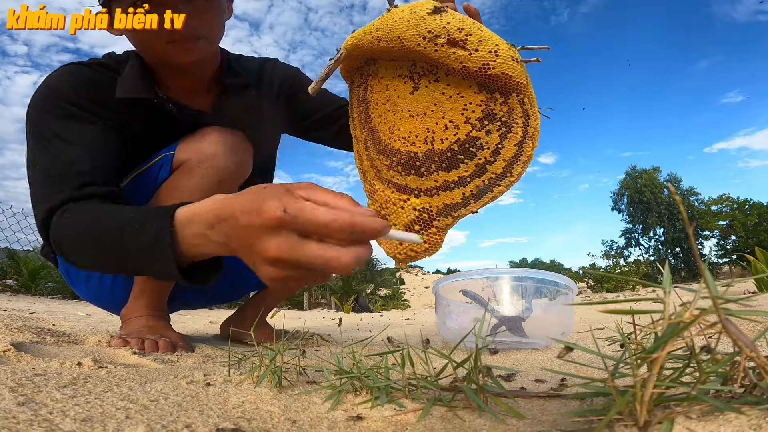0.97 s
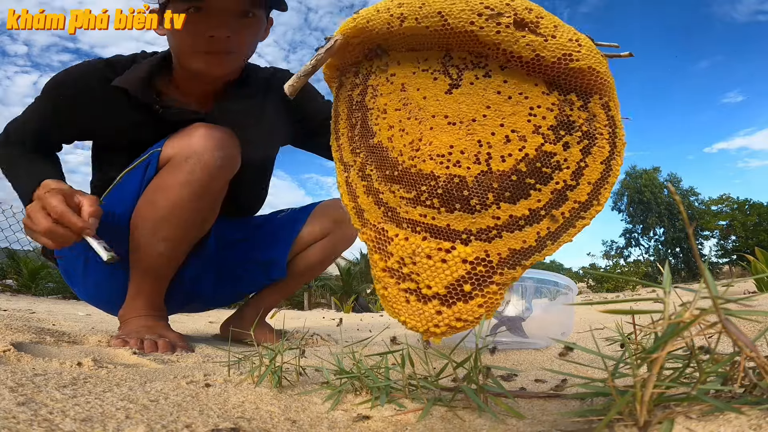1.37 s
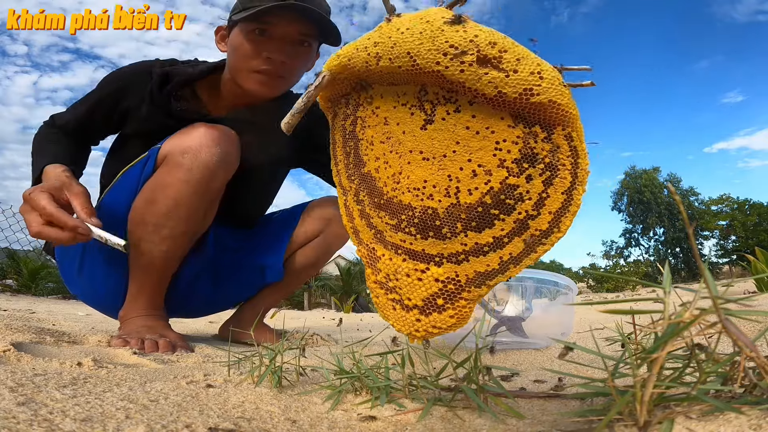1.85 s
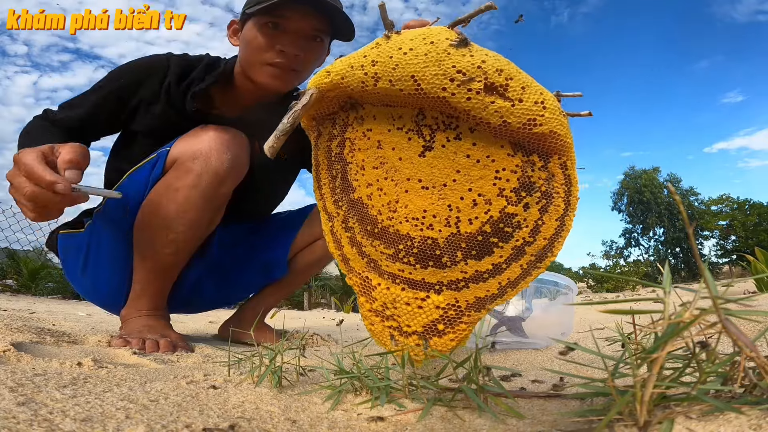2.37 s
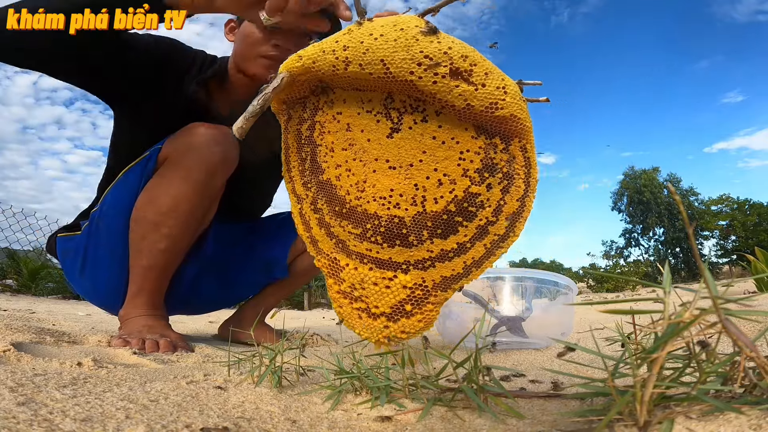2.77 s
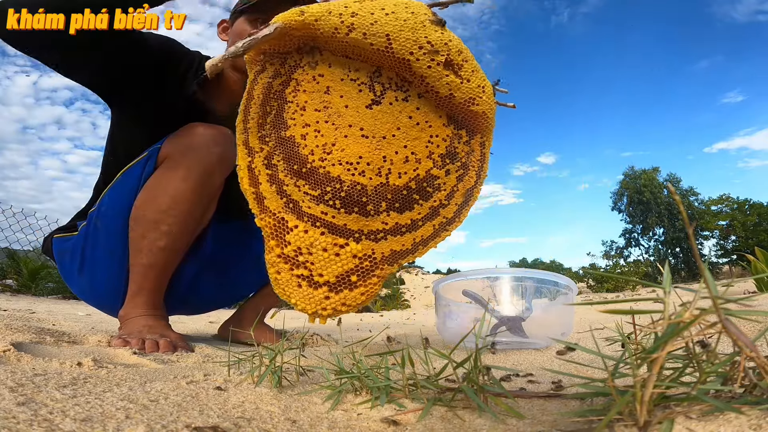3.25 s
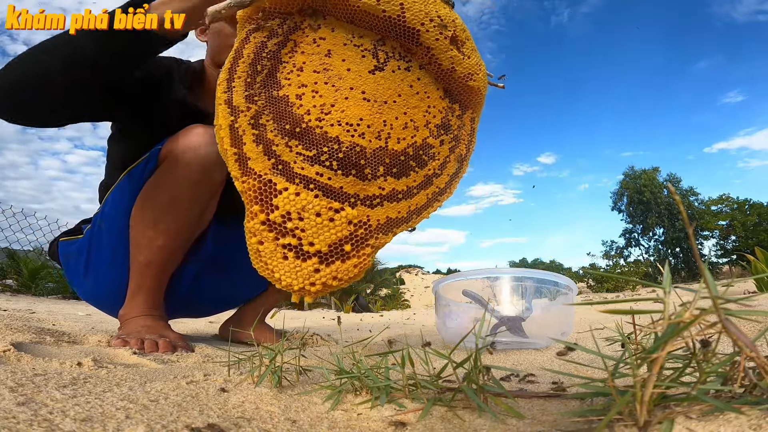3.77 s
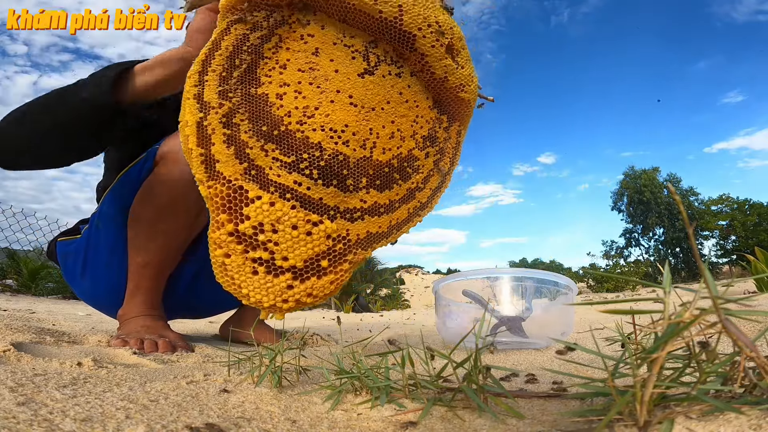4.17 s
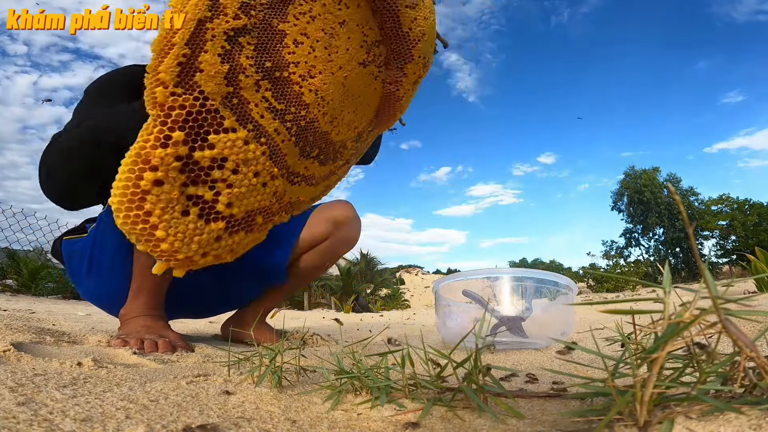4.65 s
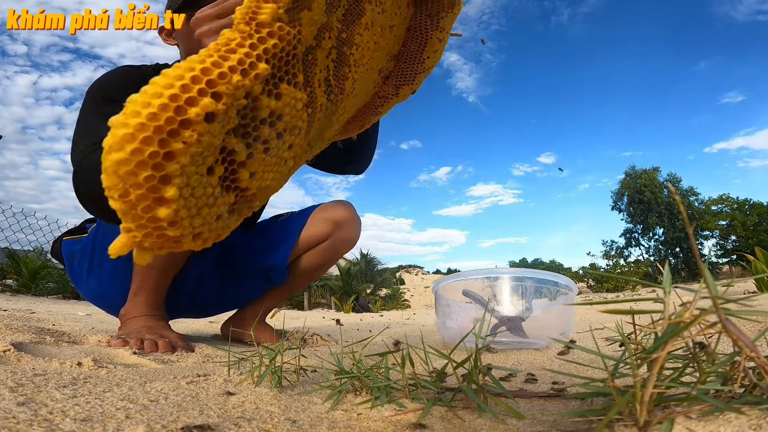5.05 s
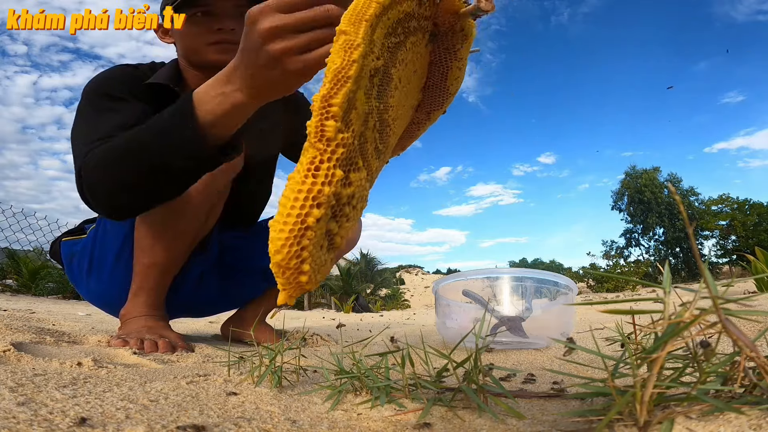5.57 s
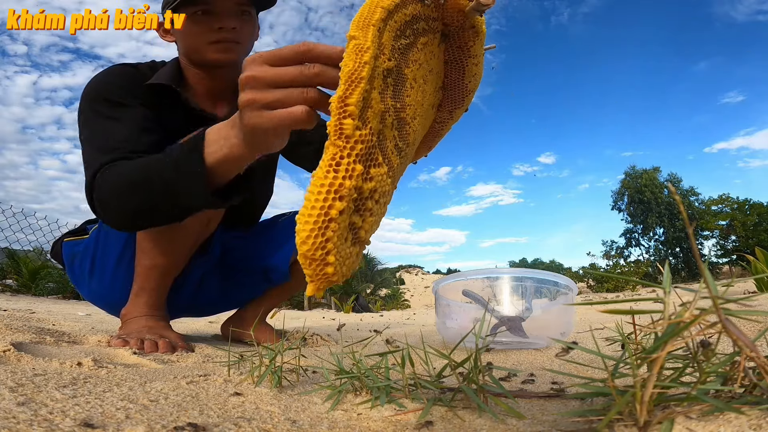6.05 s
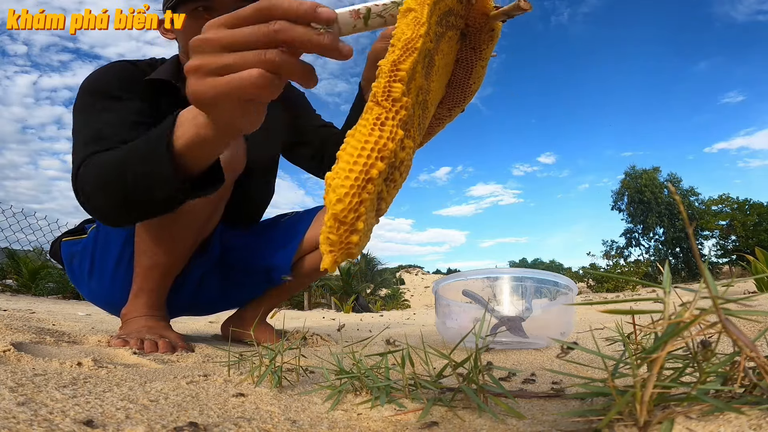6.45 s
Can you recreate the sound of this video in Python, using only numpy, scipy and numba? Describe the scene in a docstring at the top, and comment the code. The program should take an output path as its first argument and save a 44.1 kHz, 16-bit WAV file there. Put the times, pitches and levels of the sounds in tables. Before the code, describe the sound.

Someone picks at a wax comb in the open air, near a small camera microphone. Crunchy strokes and snapping cell walls come first, then a calmer middle of fine rustling and sparse clicks, a barely audible cricket trill, and finally renewed scraping and sharp crackles. Under it all lie a loose low hum of bees, a throbbing far-off engine and a soft wind rumble.

```python
"""A honeycomb is turned, scraped and picked: gritty stick-slip bursts, snapping cell walls and knocks through the wax,
all made of clicks or noise ringing in band-pass filters. Dry fibres tick and cloth rustles in fine dense grains.
Bees hum about it as stacks of wing-beat harmonics and a cricket trills faintly on one wavering tone.
Three distant engines drone as low sine orders (one slows down in steps);
wind and far traffic wash underneath as noise in swelling half-octave bands."""
import sys
import numpy as np
from scipy import signal
from scipy.fft import rfft, irfft
from scipy.io import wavfile
from scipy.ndimage import uniform_filter1d
from numba import njit

SR = 44100
rng = np.random.default_rng(int(sys.argv[2]) if len(sys.argv) > 2 else 0)


def wav_out(sig):
    """Save sig, one row per channel (or a flat mono array), as 16-bit PCM at SR to the path in sys.argv[1]."""
    wavfile.write(sys.argv[1], SR, np.round(np.clip(np.atleast_2d(sig).T, -1, 1) * 32767).astype(np.int16))


N = 296352


def undb(db):
    """Decibels to an amplitude factor."""
    return 10 ** (np.asarray(db) / 20)


def unit(x):
    """Scale to rms 1."""
    return x / np.sqrt(np.mean(x ** 2))


def peak(x):
    """Scale to peak 1."""
    return x / np.abs(x).max()


def curve(rows):
    """Columns of a breakpoint table at every sample; the first column is time [s]."""
    times, *columns = np.transpose(rows)
    return [np.interp(np.arange(N) / SR, times, column) for column in columns]


@njit
def svf(x, hz, width):
    """State-variable band-pass with a moving centre, gain 1 at the centre."""
    y, band_state, low_state = np.empty(len(x)), 0., 0.
    for i in range(len(x)):
        g = np.tan(np.pi * hz[i] / SR)
        damping = width / hz[i]
        v = (band_state + g * (x[i] - low_state)) / (1 + g * (g + damping))
        band_state = 2 * v - band_state
        low_state = low_state + 2 * g * v
        y[i] = damping * v
    return y


def band(x, hz, width):
    """Band-pass at a fixed or moving centre; hz and width in Hz."""
    return svf(x, hz + np.zeros(len(x)), float(width))


def steep(x, hz, width):
    """The same band-pass twice, for steeper skirts."""
    return band(band(x, hz, width), hz, width)


def walk(rate, size=N):
    """Random levels held 1 / rate s and slewed twice, on a grid of size points; spread near 1."""
    hold = int(SR / rate * size / N)
    steps = np.repeat(rng.standard_normal(size // hold + 1), hold)
    return 1.3 * uniform_filter1d(uniform_filter1d(steps, hold), hold)[:size]


def grit(rate, spread_db):
    """Random clicks, rate a second on average, most small and a few large; rms 1."""
    hits = rng.random(N) < rate / SR
    return unit(hits * rng.standard_normal(N) * undb(spread_db * rng.exponential(size=N)))


def wide(mid, side, side_db):
    """Stereo from a mid signal and a side signal that is opposite in the two ears."""
    return mid + undb(side_db) * side * np.array([[1], [-1]])


def wax(x):
    """The comb's dull resonances, as parallel band-passes."""
    # wax resonances: (centre [Hz], width [Hz], gain [dB])
    resonances = [(453, 390, 24.5), (800, 1300, 25), (1360, 5200, -33)]
    return sum(undb(db) * steep(x, hz, width) for hz, width, db in resonances)


def scrapes():
    """Stick-slip on wax: quick grains ring a treble band, slower slips rumble in the comb."""
    # strokes on the comb: (full pressure from [s], held for [s], gritty treble [dB], treble centre [Hz],
    # wax rumble [dB], brittle top [dB])
    strokes = [(0.081, 0.11, -62, 4600, -59.5, -68.5), (0.401, 0.06, -59, 5200, -57.5, -68.5),
               (0.616, 0.034, -66.5, 5000, -73, -74), (0.754, 0.015, -55, 4900, -49.5, -63),
               (0.778, 0.014, -56, 5300, -51, -60), (0.791, 0.016, -44.5, 5800, -46.5, -64),
               (0.929, 0.2, -74, 4380, -57.5, -82), (1.092, 0.016, -45.5, 5280, -51.5, -69),
               (2.575, 0.037, -70, 4900, -68, -75), (2.993, 0.028, -75, 4670, -69, -86),
               (3.481, 0.011, -76, 4500, -57, -80), (3.557, 0.012, -57.5, 4600, -67, -70),
               (3.98, 0.13, -76, 4700, -64, -78.5), (4.347, 0.017, -66, 6400, -80, -84),
               (4.388, 0.011, -66.5, 6300, -78, -80), (5.46, 0.036, -65.5, 4400, -62, -75),
               (5.883, 0.051, -71, 4170, -65, -89), (5.93, 0.12, -67.5, 4030, -63, -91),
               (6.24, 0.033, -58.5, 3870, -56, -77), (6.6, 0.012, -58, 4070, -65, -76),
               (6.619, 0.037, -53.5, 4100, -67, -70), (6.642, 0.008, -48, 4240, -55, -68),
               (6.666, 0.0025, -42, 4430, -55, -60), (6.682, 0.01, -66, 4600, -75, -71)]
    attack_s, release_s = 0.016, 0.013  # ramps before and after the held part
    air_db, air_db_per_octave = -18, 15  # hiss against the gritty treble at 5 kHz; more in higher scrapes
    gains, hz, t = np.zeros((3, N)), np.full(N, 5000.), np.arange(N) / SR
    for start, length, db, centre, rumble_db, top_db in strokes:
        rise = 1 + (t - start) / attack_s
        fall = 1 + (start + length - t) / release_s
        press = np.clip(np.minimum(rise, fall), 0, 1) ** 2
        gains += press * undb([[db], [rumble_db], [top_db]])
        hz = np.where(press > 0, centre, hz)
    treble_gain, rumble_gain, top_gain = gains
    grains = grit(8000, 1.7)
    slip = undb(2.4 * walk(150) + walk(45))
    treble = unit(band(steep(grains, hz, 3800), hz, 2900))
    top = unit(band(steep(grains, 8100, 3500), 9600, 3300))
    air = undb(air_db + air_db_per_octave * np.log2(hz / 5000)) * unit(steep(grains, 10900, 3400))
    mid = slip * (treble_gain * (treble + air) + top_gain * top)
    mid += rumble_gain * unit(wax(grit(2200, 0.73)))
    side = treble_gain * unit(steep(grit(4600, 1.8), hz, 3200))
    return mid * undb(np.array([[-.4], [.4]])) + wide(0, side, -9.0)


def snaps():
    """Cell walls: each gives way for a millisecond, ticks sharply and dies out in a treble burst."""
    # breaks: (start [s], burst peak [dB], burst centre [Hz], brittle top [dB], left minus right [dB])
    breaks = [(0.019, -40, 5130, -46, -3), (0.156, -44, 4840, -62, -1.0), (0.397, -44.5, 4570, -64, -1.5),
              (0.4189, -47, 5430, -60, -1.0), (0.4349, -42, 5520, -55, -1.0),
              (0.4637, -40.5, 4430, -65, -3), (0.7322, -50, 5360, -54, -1.0),
              (0.7602, -47, 5330, -52, -1.5), (0.786, -46, 5740, -53, -1.0), (0.7924, -33, 6000, -52, -1.0),
              (0.802, -36, 5730, -51, -1.5), (1.024, -47, 3940, -60, -1.0), (1.0946, -28, 5600, -61, -1.5),
              (2.577, -50, 4800, -68, 1.0), (3.5528, -56, 4770, -64, 2.0), (3.565, -48, 4610, -67, 2.0),
              (4.0642, -54, 4720, -66, 1.5), (4.1094, -57, 4700, -54, 4), (4.8534, -57, 4810, -71, -2),
              (5.1263, -52, 3350, -71, 1.0), (5.469, -51, 4440, -67, 0.0), (5.8636, -43, 3810, -71, 0.5),
              (5.889, -45, 3900, -70, 1), (5.895, -41, 4300, -62, 3), (5.942, -43, 4460, -62, 2),
              (5.951, -43, 3940, -72, 1), (5.967, -48, 3890, -74, -0.5), (6.023, -55, 4000, -72, 2),
              (6.2056, -45.5, 4170, -69, 2), (6.2452, -58, 4340, -68, -3), (6.286, -36.5, 4200, -49, 3),
              (6.2902, -39, 4140, -53, -3), (6.582, -36, 4200, -70, 3), (6.586, -47, 4260, -67, -0.5),
              (6.604, -35, 3710, -66, -2), (6.616, -44, 4160, -65, -0.5), (6.622, -32, 4440, -64, 2),
              (6.6291, -38, 4470, -59, 0.5), (6.6432, -30, 4500, -55, 1.0), (6.649, -38, 4240, -45, -0.5),
              (6.661, -40, 4560, -48, -0.5), (6.6649, -29, 4180, -28.5, -1), (6.6686, -29, 4300, -47, 2)]
    decay_s, tick_height, air_db = 0.0015, 7, -17  # tick against the noise, air against the brittle band
    out, t = np.zeros((2, N + 1024)), np.arange(1024) / SR - .001  # the tick is at t = 0
    for (start, db, hz, top_db, pan_db), noise in zip(breaks, rng.standard_normal((len(breaks), 1024))):
        envelope = np.exp(np.minimum(2500 * t, -t / decay_s))
        burst = noise * envelope + tick_height * (np.abs(t) < .5 / SR)
        brittle = peak(band(steep(burst, 7600, 3000), 7600, 3000))
        brittle = brittle + undb(air_db) * peak(steep(burst, 11000, 4000))
        body = peak(band(steep(burst, hz, 2150), hz, 2800))
        sound = undb(db) * body + undb(top_db) * brittle
        i = int(start * SR)
        out[:, i:i + 1024] += sound * undb(np.array([[pan_db], [-pan_db]]) / 2)
    return out[:, :N]


def knocks():
    """A soft push of a cycle or two, and a little crunch through the wax."""
    # knocks through the wax: (start [s], push peak [dB], push pitch [Hz])
    pushes = [(0.0204, -35, 1180), (0.079, -48, 1400), (0.097, -42, 980), (0.117, -45, 1000),
              (0.139, -47, 1050), (0.088, -42, 694), (0.107, -49, 1400), (0.128, -45, 750),
              (0.147, -52, 1400), (0.157, -39, 1140), (0.173, -43, 780), (0.398, -37, 950),
              (0.418, -43, 980), (0.435, -42, 820), (0.447, -50, 1310), (0.464, -33, 1110),
              (0.731, -40.5, 1020), (0.756, -37.5, 870), (0.765, -39, 1010), (0.786, -34.5, 710),
              (0.795, -47, 690), (0.802, -36, 1360), (1.0245, -54, 2200), (1.0665, -42, 1100),
              (1.106, -36.5, 1190), (3.562, -50, 2500), (3.993, -43, 910), (4.009, -58, 1900),
              (3.972, -47, 800), (4.03, -53, 800), (4.048, -56, 1300), (4.0695, -43.5, 1120),
              (4.11, -50, 900), (5.129, -45, 860), (5.89, -54, 2500), (5.895, -44, 1000),
              (5.943, -48, 2300), (6.287, -41.5, 754), (6.288, -50, 2400), (6.583, -52, 2400),
              (6.623, -46, 2500), (6.666, -45, 1260), (6.667, -34.5, 2820)]
    out, t = np.zeros(N + 1024), np.arange(1024) / SR
    for (start, db, hz), noise in zip(pushes, rng.standard_normal((len(pushes), 1024))):
        push = peak(t ** 2 * np.exp(-t * hz / 0.5) * np.sin(2 * np.pi * hz * t))
        crunch = peak(wax(noise * np.exp(-t / 0.005)))
        i = int(start * SR)
        out[i:i + 1024] += undb(db) * (push + undb(-6.0) * crunch)
    return out[:N] * undb(np.array([[-.6], [.6]]))


def ticks():
    """Dry fibres: an impulse and fast-dying noise through a broad band-pass make very short clicks."""
    # clicks: (start [s], peak [dB], centre [Hz], left minus right [dB])
    clicks = [(1.0242, -50, 3940, -1.0), (1.1704, -56, 3590, 0.0), (1.2094, -56, 5190, 0.0),
              (1.3862, -58, 4290, 0.5), (1.8564, -48, 5020, -1.0), (1.9154, -45, 4250, -1.0),
              (2.1154, -48, 3420, -1.5), (2.1894, -66, 3040, 0.0), (2.217, -47, 3180, 0.0),
              (2.2484, -48, 4220, -0.5), (2.319, -48, 4890, -0.5), (2.9555, -51, 3530, 0.5),
              (3.2324, -58, 4910, 0.0), (3.4845, -48, 3820, 0), (4.0976, -52, 4690, 1.5),
              (4.3171, -52, 5330, 1.0), (4.5524, -50, 6280, -0.5), (5.3862, -57, 4460, 1.0),
              (5.4585, -48, 3930, 0.5), (5.5917, -51, 4300, 4), (5.895, -56, 4760, -1),
              (5.9434, -53, 3800, 0.5)]
    decay_s = .001
    out, t = np.zeros((2, N + 256)), np.arange(256) / SR
    for (start, db, hz, pan_db), noise in zip(clicks, rng.standard_normal((len(clicks), 256))):
        click = peak(band((noise + 3 * (t == 0)) * np.exp(-t / decay_s), hz, 6000))
        i = int(start * SR)
        out[:, i:i + 256] += undb(db) * click * undb(np.array([[pan_db], [-pan_db]]) / 2)
    return out[:, :N]


def rustle():
    """Fine dense grains from cloth and skin: a moving mid band that ends near 8 kHz and an airy top."""
    # cloth and hands moving: (time [s], level [dB], centre [Hz], airy top against the body [dB])
    movement = [(0, -67, 5140, -11.5), (.54, -68, 4860, -9.5), (.88, -65, 5460, -14.5),
                (.95, -59, 4280, -15.5), (1.3, -66, 4760, -13), (1.48, -65, 4300, -12.5),
                (1.62, -66.5, 4550, -15), (1.8, -69, 4800, -13), (1.89, -60, 4270, -12),
                (1.97, -62, 4160, -14), (2.1, -59.5, 3750, -12.5), (2.26, -66, 4200, -12),
                (2.33, -62, 4170, -14), (2.5, -64.5, 4700, -12), (2.8, -65.5, 4500, -12.5),
                (3.07, -67.5, 4600, -14), (3.19, -72, 4630, -11), (3.25, -62.5, 4600, -15),
                (3.34, -67.5, 4150, -14), (3.5, -64, 4160, -16), (3.62, -71, 4900, -9.5),
                (3.74, -67.5, 4600, -9), (3.84, -68, 3500, -13), (4.28, -69, 5100, -14),
                (4.36, -64.5, 5400, -12), (4.48, -65, 5200, -12), (4.6, -67, 4370, -11.5),
                (4.85, -68, 4340, -12), (5.15, -67, 4240, -15), (5.22, -68.5, 4140, -15),
                (5.46, -66.5, 3800, -13.5), (5.63, -71.5, 4330, -12), (5.89, -66, 3840, -15),
                (6.2, -74, 4220, -11), (6.72, -72.5, 4500, -7)]
    # narrow ring against the broad band: (time [s], level [dB])
    ring_level = [(0, -5), (1.2, -11), (2.2, -5), (2.5, -5), (3.0, -7.5), (4.3, -10.5), (4.75, -5),
                  (5.0, -2), (5.45, -0.5), (5.7, -3.5), (6.72, -1.5)]
    db, hz, air_db = curve(movement)
    mid, side = grit(9000, 1.36), grit(8200, 1.4)
    edge = signal.butter(10, 7900, fs=SR, output="sos")
    # the ring wanders round the centre and comes in patches
    ring_gain = undb(curve(ring_level)[0] + 1.74 * walk(14))
    ring = ring_gain * unit(steep(grit(6000, 1.8), hz * (1 + 0.046 * walk(8)), 1800))
    body = wide(unit(unit(band(mid, hz, 7800)) + ring), unit(band(side, hz, 3600)), -10)
    air_mid = unit(steep(mid + 0.38 * grit(500, 1.2), 10850, 8700))
    air = wide(air_mid, unit(steep(side, 13500, 7000)), -5.5)
    # folds catch and let go some tens of times a second
    folds = undb(db + 0.84 * walk(24.85) + 0.63 * walk(70))
    return folds * (signal.sosfilt(edge, body) + undb(air_db + 0.77 * walk(4.3)) * air)


def bee(hz):
    """Wing beats on a coarse time grid: a harmonic stack that follows the wing rate."""
    # wing harmonics: (multiple of the wing rate, relative level [dB])
    harmonics = [(1, 4.5), (2, 1), (3, -8), (4, -12), (5, -15.5), (6, -7.5), (7, -12.5), (8, -12.5)]
    turn = 2 * np.pi * np.cumsum(hz) * N / len(hz) / SR
    return unit(sum(undb(db) * np.sin(k * turn + k * k) for k, db in harmonics))


def bees(count=14):
    """A loose swarm whose members drift in pitch, level and side, and a few that come nearer and leave."""
    # nearness of the swarm: (time [s], level [dB])
    swarm_nearness = [(0, 2.5), (1.2, 0), (2.5, 4), (3.5, 1), (4.5, 3.5), (5.5, 0), (6.72, -1.5)]
    # nearer bees: (nearest at [s], heard for [s], mean wing rate [Hz], level when nearest [dB])
    passes = [(1.0, 0.61, 231.1, -58), (2.6, 0.39, 229.3, -63.5), (3.75, 0.94, 212.7, -73),
              (4.6, 0.45, 215.6, -58.5), (5.0, 0.64, 212, -61), (5.9, .5, 226.7, -59)]
    swarm_hz, swarm_spread, swarm_db = 223.9, .065, -57.5  # spread as a share of the wing rate
    n = N // 8  # the hum is low enough for a grid of every eighth sample
    out, t = np.zeros((2, n)), np.arange(n) * N / n / SR
    for _ in range(count):
        detune = swarm_spread * (rng.standard_normal() + .4 * walk(3, size=n))
        hz = swarm_hz * (1 + detune + 0.005905 * walk(25, size=n))
        side = 0.25 * walk(1.44, size=n)
        out += bee(hz) * undb(2.94 * walk(3.11, size=n)) * np.array([1 + side, 1 - side])
    out = unit(out) * undb(swarm_db + curve(swarm_nearness)[0][::8][:n])
    for nearest, length, hz, db in passes:
        near = np.exp(-(2 * (t - nearest) / length) ** 4)
        level = undb(db + 2.2 * walk(9, size=n))
        wing_hz = hz * (1 + .014 * walk(3, size=n) + .008 * walk(14, size=n))
        out += near * level * bee(wing_hz)
    return signal.resample(out, N, axis=1)


def cricket():
    """Short faint trills on one slightly wavering pitch."""
    # trills: (start [s], length [s], level [dB])
    trills = [(3.17, .06, -77), (3.235, 0.068, -78), (3.32, 0.1, -73), (3.823, 0.097, -69)]
    t = np.arange(N) / SR
    tone = np.sin(2 * np.pi * np.cumsum(3280 + 8 * walk(30)) / SR)  # Hz
    out = np.zeros(N)
    for start, length, db in trills:
        swell = np.sin(np.pi * np.clip((t - start) / length, 0, 1)) ** .5
        out += np.sqrt(2) * undb(db) * tone * swell
    return out * undb(.8 * walk(26))


def engines():
    """Far exhausts arrive as nearly pure low tones: a slowing engine, a steady one and an idling one."""
    # slowing engine, swelling and fading: (time [s], level [dB])
    drone_level = [(0.0, -44), (0.07, -35.5), (0.34, -38), (0.65, -34.5), (0.94, -50), (1.14, -36),
                   (1.27, -39.5), (1.42, -33.5), (1.74, -39.5), (1.91, -52), (1.96, -39.5), (2.15, -46.5),
                   (2.24, -36.5), (2.32, -45), (2.41, -37), (2.73, -32.5), (2.83, -38.5), (3.03, -28.5),
                   (3.24, -31.5), (3.31, -36), (3.7, -33.5), (3.84, -39.5), (4.04, -41.5), (4.13, -36),
                   (4.6, -33.5), (4.73, -39), (4.79, -37), (4.88, -38), (5.24, -28.5), (5.71, -34),
                   (5.8, -43), (6.03, -40), (6.1, -32.5), (6.42, -30.5), (6.61, -38), (6.72, -49)]
    # its pitch, falling in steps: (time [s], frequency [Hz])
    drone_pitch = [(0, 61.3), (.95, 61.3), (1.1, 60), (3.7, 60), (4.3, 58.6), (6.72, 58.5)]
    # steady engine: (time [s], level [dB], lift of the upper orders [dB])
    steady_level = [(0, -51, 1), (.6, -47, -6), (1.3, -48.5, -7.5), (2.0, -48, -10), (2.4, -50, -5.5),
                    (3.3, -51, -1), (3.75, -43, -23), (4.3, -52, 3.5), (4.75, -42.5, -4.5),
                    (5.05, -44.5, -2.5), (5.4, -45, -4.5), (5.75, -45.5, -2), (6.0, -46.5, 3.5),
                    (6.3, -46.5, -4.5), (6.72, -46, -6)]
    # its orders: (multiple of the firing rate, relative level [dB], share of the lift)
    steady_orders = [(2, 0, 0.067), (4, -7, 1), (5, -19, 1)]
    # idling engine: (multiple of the cycle rate, level [dB])
    idle_orders = [(2, -54.5), (3, -57), (5, -52.5), (6, -53.5), (7, -63.5), (9, -58.5), (10, -61.5),
                   (11, -58)]
    steady_hz, steady_sag_hz_per_s = 59.72, .062
    idle_hz, flutter_db = 15.3, 1.2  # cycle rate of the idling engine; flutter of the slowing one
    t = np.arange(N) / SR
    hz = curve(drone_pitch)[0] + 0.19 * walk(8.3)
    drone_gain = undb(curve(drone_level)[0] + flutter_db * walk(9))
    drone = drone_gain * np.sin(2 * np.pi * np.cumsum(hz) / SR)
    firing_hz = (steady_hz - steady_sag_hz_per_s * t) * (1 + .0012 * walk(3.84))
    turn = 2 * np.pi * np.cumsum(firing_hz) / SR
    level_db, lift_db = curve(steady_level)
    steady = sum(undb(level_db + db + share * lift_db + 0.8 * walk(6)) * np.sin(k * turn)
                 for k, db, share in steady_orders)
    cycle = 2 * np.pi * np.cumsum(idle_hz * (1 + .004 * walk(2))) / SR
    idle = sum(undb(db + 4.1 * walk(1.52)) * np.sin(k * cycle + k * k) for k, db in idle_orders)
    return np.sqrt(2) * (drone + steady + idle)  # sine levels are rms


def wash():
    """Wind and far traffic: noise in half-octave bands that swell together and flicker alone."""
    # colour of the noise: (frequency [Hz], relative density [dB per Hz])
    mid_colour = [(25, 0.5), (45, -2.5), (80, -0.5), (110, -2), (150, -5.5), (190, -9), (255, -18),
                  (340, -17.5), (500, -22.5), (780, -32), (1100, -25.5), (1600, -32.5), (2700, -42.5),
                  (5000, -64), (7800, -48), (8300, -54), (12500, -67)]
    # width of the noise: (frequency [Hz], side minus mid [dB])
    side_colour = [(60, -50), (110, -44), (200, -23), (370, -12.5), (680, -9), (1260, -8.5), (2310, -5.5),
                   (4240, 7), (7800, -3.5), (14300, 1)]
    # swells: (time [s], traffic roar near 1150 Hz [dB], wind rumble near 200 Hz [dB], near 600 Hz [dB])
    swells = [(0, -2.5, 6, -2.5), (.7, -2.5, 2.5, 3), (1.4, -0.5, 0.5, -2), (2.1, 1, 4, -0.5),
              (2.8, -4, -11.5, 2.5), (3.5, -2, 7, 2), (4.2, -4, -3.5, 3.5), (4.9, 3.5, 2, -2),
              (5.6, 3, 3, 1.5), (6.72, 6, 5.5, 0)]
    wash_db = -42.5
    f = np.log(np.maximum(np.fft.rfftfreq(N, 1 / SR), 1))
    mid_hz, mid_db = np.transpose(mid_colour)
    side_hz, side_db = np.transpose(side_colour)
    colour = undb(np.interp(f, np.log(mid_hz), mid_db)) * (f > np.log(18))
    side = undb(np.interp(f, np.log(side_hz), side_db))
    mid, other = rfft(rng.standard_normal((2, N))) * colour
    roar_db, wind_db, low_mid_db = curve(swells)
    out, gust, step = 0, walk(0.98), np.log(2) / 2
    for centre in np.log(20) + step * np.arange(20):
        part = np.sqrt(np.clip(1 - np.abs(f - centre) / step, 0, 1))
        band_mid, band_side = irfft(part * np.array([mid, other * side]), N)
        db = .4 * gust + walk(7)
        db += roar_db * np.exp(-((centre - np.log(1150)) / 0.67) ** 2)
        db += wind_db * np.exp(-((centre - np.log(200)) / 0.29) ** 2)
        db += low_mid_db * np.exp(-((centre - np.log(600)) / 0.67) ** 2)
        out = out + undb(db) * wide(band_mid, band_side, 0)
    return unit(out) * undb(wash_db)


def scene():
    """Sum of all layers; engines, bees, knocks and wash come from the right."""
    low = engines() + bees() + knocks() + wash()
    low[0] = np.roll(low[0], shift=2)  # two samples late on the left
    return low + rustle() + scrapes() + snaps() + ticks() + cricket()


def record(dry):
    """A small camera rolls off the top from 13.5 kHz and then cuts it at 14.8 kHz."""
    soft = signal.sosfilt(signal.butter(12, 13500, fs=SR, output="sos"), dry)
    return signal.sosfilt(signal.ellip(8, .2, 60, 14800, fs=SR, output="sos"), soft)


dry = scene()
out = record(dry)
wav_out(out)
```